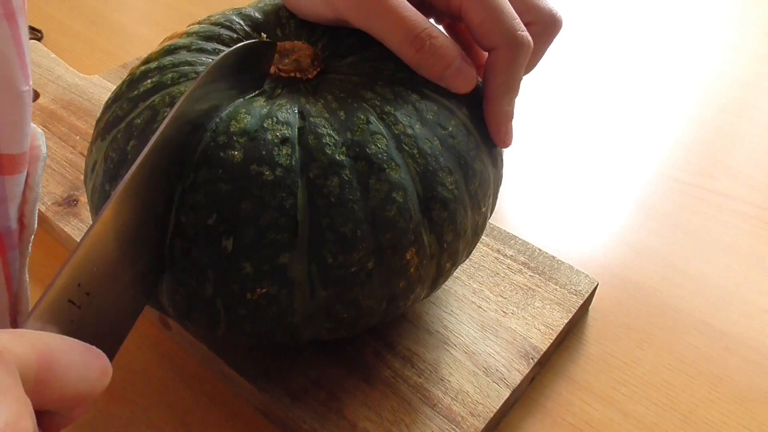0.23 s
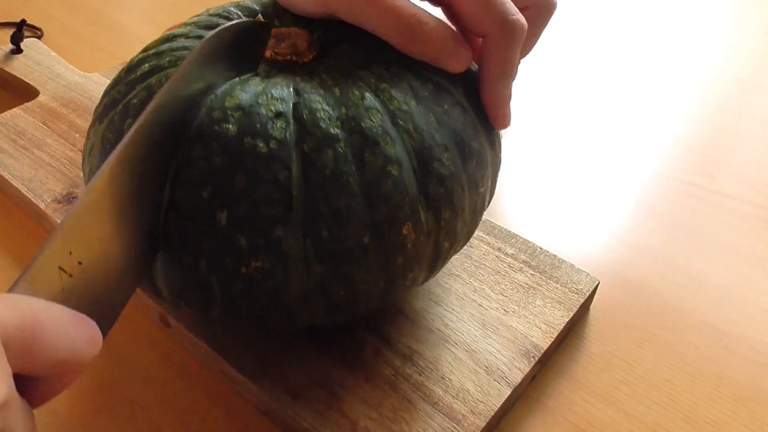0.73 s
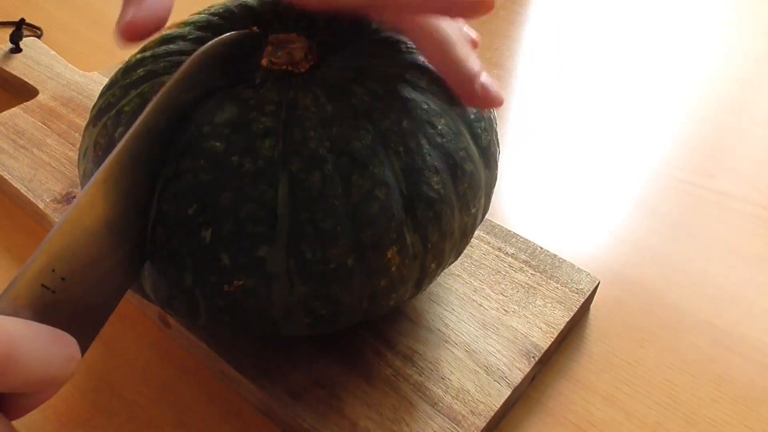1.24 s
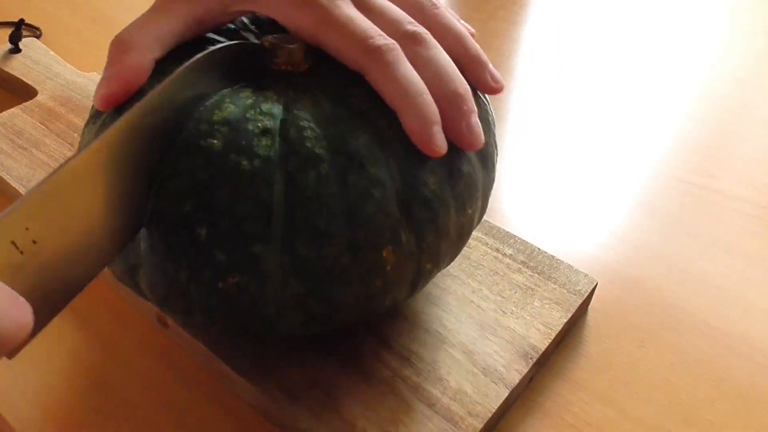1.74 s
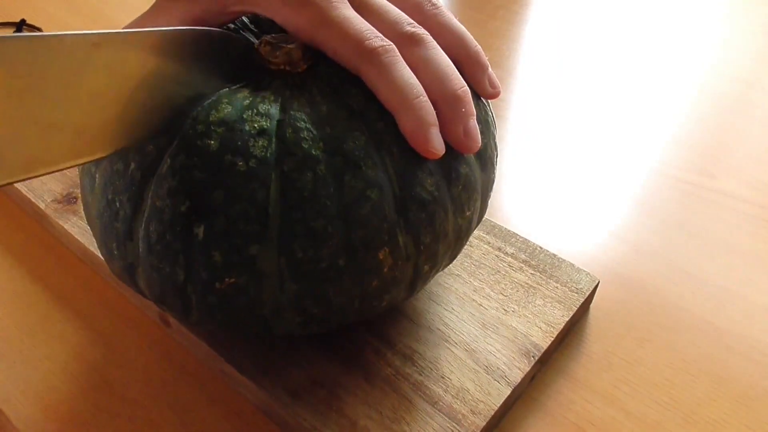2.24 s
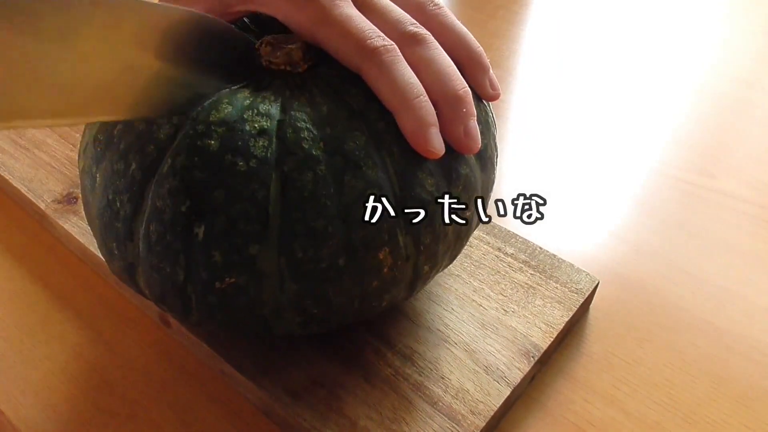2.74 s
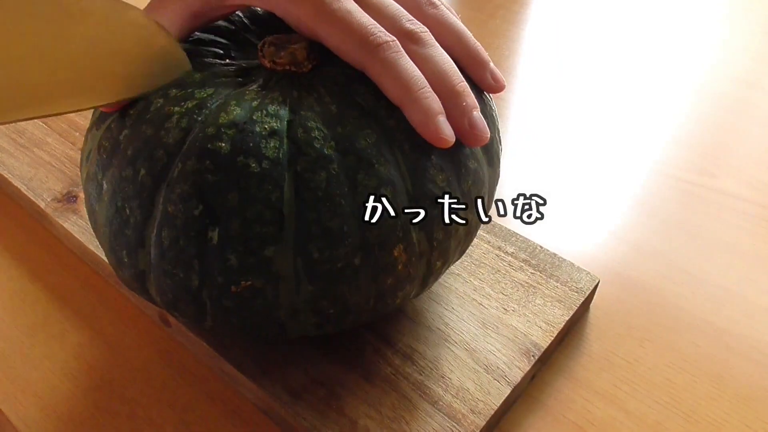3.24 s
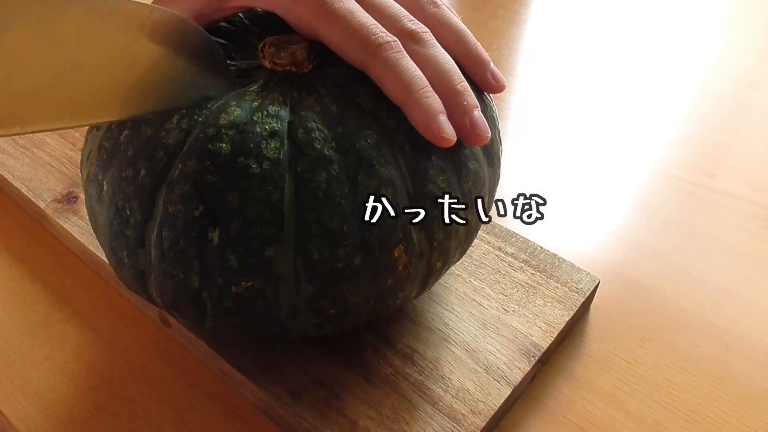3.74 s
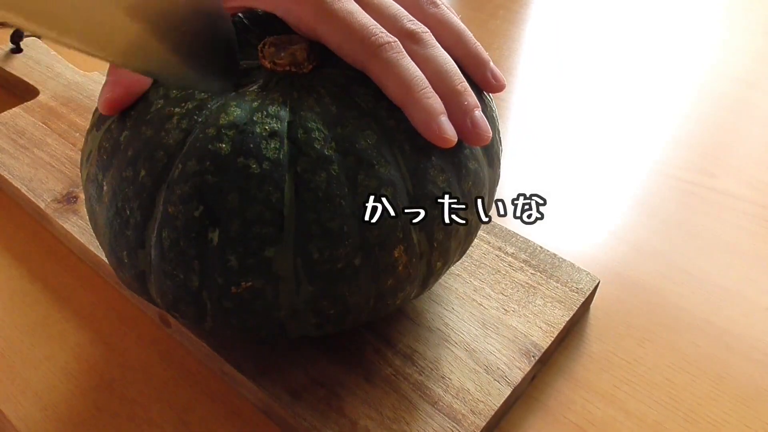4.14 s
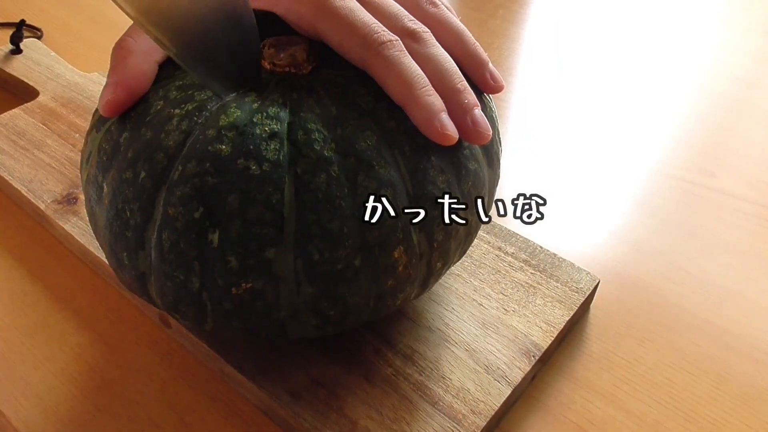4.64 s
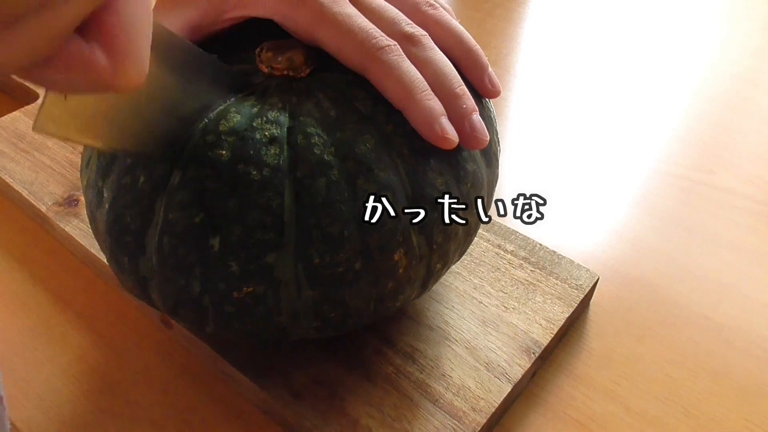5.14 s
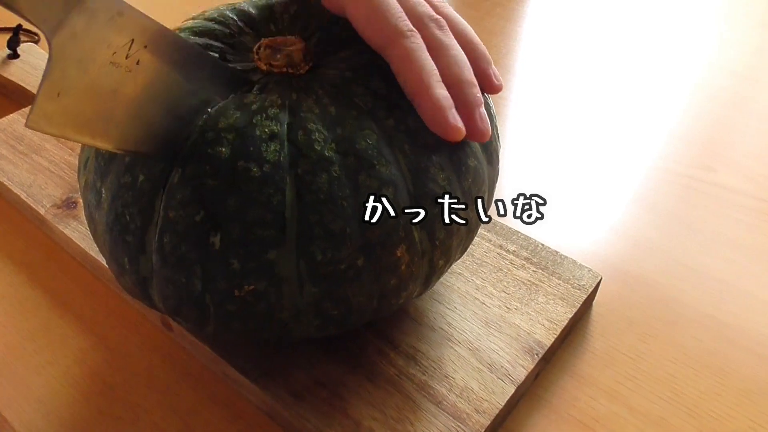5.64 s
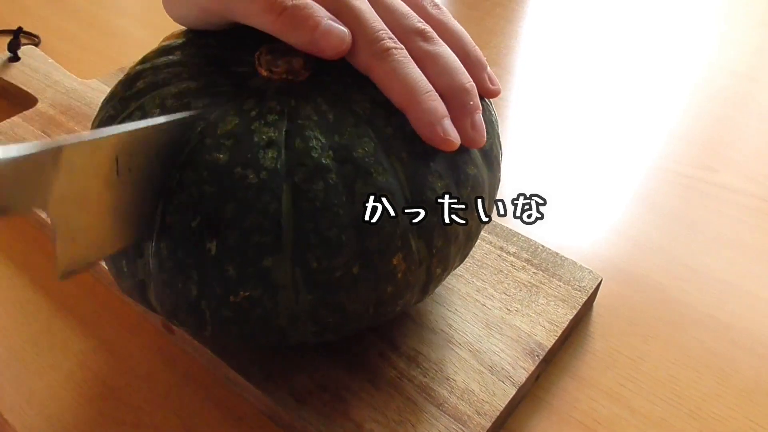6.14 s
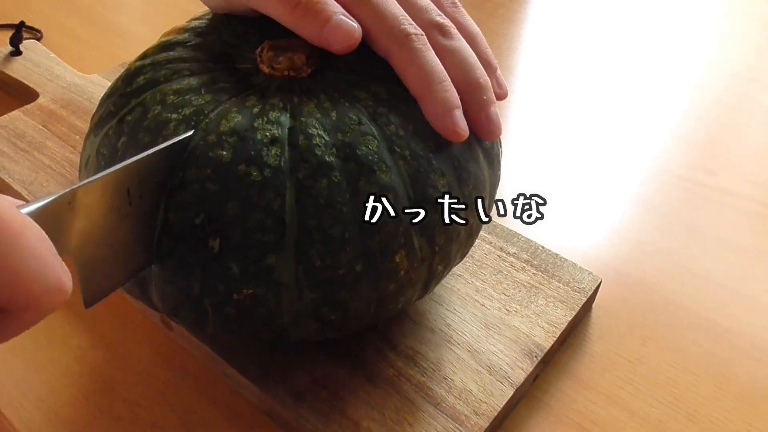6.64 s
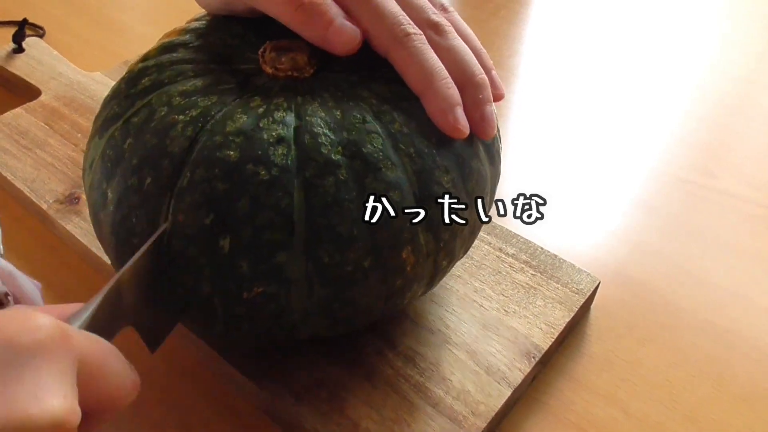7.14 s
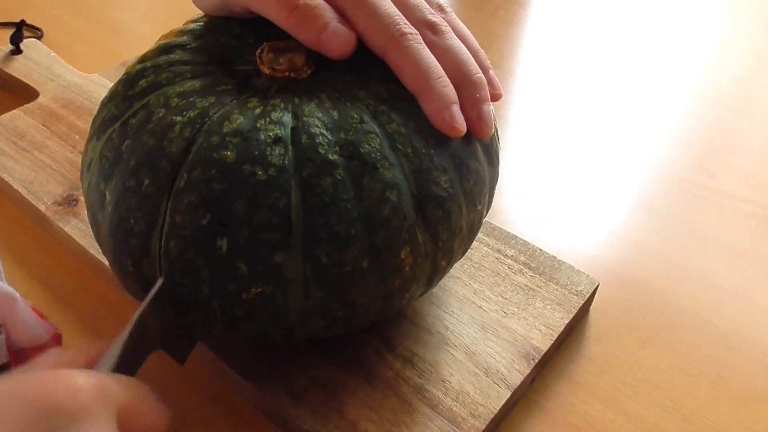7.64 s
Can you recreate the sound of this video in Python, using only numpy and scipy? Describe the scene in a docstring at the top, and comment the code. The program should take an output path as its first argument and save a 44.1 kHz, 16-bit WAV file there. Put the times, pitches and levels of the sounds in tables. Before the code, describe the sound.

In a quiet room with a soft hum, a hand rubs on a knife handle. The blade is then worked into a hard squash in short, crunching pushes, and the squash knocks on a wooden board and table. The steel taps the rind and rings faintly, then squeaks and scrapes as the rind snaps. Near the end it splits with the loudest knock, followed by a few more cracks. Small ticks sound close to the microphone.

```python
"""A kitchen knife is worked into a hard squash on a wooden board, in a quiet, humming room.
First a hand rubs on the handle; from then on a small part of a nearby camera ticks now and then.
From 1 s the blade rubs through the flesh in short pushes, and the squash knocks on board and table.
Near 2.9 s the steel taps the rind and rings faintly; then it squeaks and the rind snaps as it cuts on.
Just after 7.2 s the rind splits with the loudest knock; a last few cracks and knocks follow near 7.7 s."""
import sys
import numpy as np
from scipy import signal
from scipy.fft import rfft, irfft
from scipy.io import wavfile

SR = 44100
rng = np.random.default_rng(int(sys.argv[2]) if len(sys.argv) > 2 else 0)


def dump_mix(stems):
    """Bounce the given channels to the path in sys.argv[1] as a 16-bit WAV at rate SR."""
    frames = np.atleast_2d(stems).T  # one column per channel
    limited = np.clip(frames, -1, 1)  # hard clip at full scale
    pcm = np.round(limited * 32767).astype(np.int16)
    wavfile.write(sys.argv[1], SR, pcm)


N = 347949
HZ = np.fft.rfftfreq(N, 1 / SR)
RING_T = np.arange(SR // 2) / SR  # half a second for a struck thing to ring
TILT_PIVOT_HZ = 4000  # a sound is made brighter or duller around this pitch


def amp(db):
    """Turns decibels into gain."""
    return 10 ** (np.asarray(db) / 20)


def unit(x):
    """Scales a signal to an average (rms) level of 1."""
    return x / np.sqrt(np.mean(x ** 2) + 1e-20)


def read(points, hz):
    """Reads between the rows of a table, on a log-frequency axis."""
    f, value = np.transpose(points)
    return np.interp(np.log(hz + 1), np.log(f), value)


def add(mix, s, sound):
    """Mixes a sound in at s seconds."""
    part = mix[..., max(round(s * SR), 0):][..., :sound.shape[-1]]
    part += sound[..., :part.shape[-1]]


def convolve(x, response):
    """Passes a signal through a response, channel by channel."""
    return signal.fftconvolve(np.atleast_2d(x), np.atleast_2d(response), axes=1)[:, :N]


def ring(modes, flip=True):
    """A struck body's tones, each fading 60 dB in its fade time t60; flip inverts every second one."""
    wave = sum((-1 if flip else 1) ** k * amp(db - 60 * RING_T / t60) * np.cos(2 * np.pi * hz * RING_T)
               for k, (hz, db, t60) in enumerate(modes))
    return wave / abs(wave).max()


def click(spectrum, size=2048):
    """A click with a sharp front and the given tone colour, of energy 1."""
    log_gain = np.log(amp(read(spectrum, abs(np.fft.fftfreq(size, 1 / SR)))))
    wave = np.fft.ifft(np.exp(signal.hilbert(log_gain))).real
    wave = np.roll(wave[::-1], 1)[:size // 2]
    return wave / np.linalg.norm(wave)


def stereo(sources, spectrum, alike):
    """Colours two unrelated signals and blends them into a partly alike left and right."""
    left, other = rfft(sources)
    same = np.clip(read(alike, HZ), 0, 1)
    right = same * left + np.sqrt(1 - same ** 2) * other
    return unit(irfft(np.array([left, right]) * amp(read(spectrum, HZ)), N))


def drift(rate_hz):
    """A smooth random wander of average size 1."""
    return unit(irfft(rfft(rng.standard_normal(N)) * np.exp(-(HZ / rate_hz) ** 2), N))


def resonate(x, hz, width_hz):
    """Makes a signal ring around one pitch, which may glide."""
    turn = np.exp(2j * np.pi * np.cumsum(hz * np.ones(x.shape[-1])) / SR)
    decay = np.exp(-np.pi * abs(width_hz) / SR)
    return unit((turn * signal.lfilter([1 - decay], [1, -decay], x / turn)).real)


def grainy(grain_db, channels=2, size=N):
    """Noise roughened by random jumps in level."""
    return rng.standard_normal((channels, size)) * amp(grain_db * np.minimum(rng.exponential(1, size), 6))


def crackle(per_s):
    """Single spikes at random moments, in two channels."""
    return rng.standard_normal((2, N)) * (rng.random(N) < per_s / SR)


# The colour of the ventilation. Each row: frequency in Hz, relative level in dB.
VENT_COLOUR = [(20, -22), (50, -15), (85, -6.5), (130, -10), (228, -5.5), (400, -6.5), (520, -10.5),
               (900, -12.5), (1300, -19), (1900, -29), (3000, -33.5), (3800, -32), (4600, -34.5),
               (6400, -37.5), (8200, -33), (9100, -32), (9800, -33.5), (10500, -32), (12000, -36),
               (16000, -39)]
# How alike left and right are for air and hand. Each row: frequency in Hz, likeness from 0 to 1.
AIR_ALIKE = [(60, 0.89), (290, 0.81), (640, 0.55), (1400, 0.5), (3100, 0.39), (7000, 0.15), (15000, 0)]
# The hum of an appliance. Each row: pitch in Hz, level in dB.
HUM_TONES = [(140, -70.5), (457.6, -70), (500.6, -72.5), (936.7, -75)]
def room_tone(vent_db=-53.5, swell_db=0.5, waver_db=2.5, whine_db=-77.5):
    """Soft ventilation noise, an appliance's wavering hum and a thin electric whine."""
    t = np.arange(N) / SR
    hum = sum(amp(db + waver_db * drift(3.0)) * np.sqrt(2) * np.sin(2 * np.pi * hz * t + drift(4.3))
              for hz, db in HUM_TONES)
    whine = amp(whine_db) * resonate(rng.standard_normal((2, N)), hz=9050, width_hz=250)
    vent_gain = amp(vent_db + swell_db * drift(5.9))
    return vent_gain * stereo(rng.standard_normal((2, N)), VENT_COLOUR, AIR_ALIKE) + hum + whine


# How long the room rings. Each row: frequency in Hz, fade time in seconds.
ROOM_FADE = [(100, 0.55), (400, 0.3), (2000, 0.28), (12000, 0.028)]
def room_echo(x, first_echo_s=0.00455):
    """Reflections blur into a short tail whose high notes die first."""
    noise = rng.standard_normal((2, len(RING_T))) * (RING_T > first_echo_s)
    hz, t, bands = signal.stft(noise, SR, nperseg=256)
    tail = signal.istft(bands * amp(-60 * t / read(ROOM_FADE, hz)[:, None]), SR, nperseg=256)[1]
    return convolve(x, tail / np.linalg.norm(tail[0]))


# The camera's ticks. Each row: start in seconds, level in dB.
CAMERA_TICKS = [(0.3598, -35), (0.4726, -37.5), (1.193, -25), (1.2645, -27), (1.381, -37.5), (1.4417, -43),
                (1.798, -20), (1.8856, -21.5), (2.0357, -22), (2.9652, -22), (3.081, -36), (3.1837, -41),
                (3.3054, -43.5), (5.248, -21.5), (5.3005, -25.5), (5.3664, -24.5), (6.1264, -27),
                (6.381, -22.5), (7.258, -30)]
# The ticking part's tones. Each row: pitch in Hz, left and right relative dB, fade time in seconds.
TICK_TONES = [(978, -4, -9.5, 0.03), (1157, -2, -6, 0.023), (2000, -8, -11, 0.022),
              (2430, -12.5, -15, 0.02), (2960, -11, -19, 0.039), (3580, 3, -5.5, 0.012),
              (4370, -24, -31.5, 0.022), (4750, -13, -14, 0.013), (5310, -6.5, -6, 0.018),
              (5980, 3, -8, 0.0076), (6800, -5, -1, 0.0068), (7480, -8, 5, 0.0038), (8700, -4, -3, 0.0037),
              (10100, -30, -25, 0.0021), (13300, -18, -7, 0.004)]
def camera_ticks(right_db=-4.5, right_lag_s=0.00021, buzz_db=-8, buzz_t60=0.015, detune=0.008):
    """A small part ticks, a little differently each time, and the casing buzzes for an instant."""
    out, t = np.zeros((2, N)), RING_T[:SR // 20]
    hardest_db = max(db for _, db in CAMERA_TICKS)
    usual_hz, left_tones_db, right_tones_db, t60 = np.transpose(TICK_TONES)
    for s, db in CAMERA_TICKS:
        hz = usual_hz * (1 + detune * rng.standard_normal(len(usual_hz)))
        change_db = 1.2 * rng.standard_normal(len(hz))
        change_db += 0.23 * (db - hardest_db) * np.log2(hz / TILT_PIVOT_HZ)  # a softer tick is duller
        add(out[0], s, amp(db) * ring(zip(hz, left_tones_db + change_db, t60)))
        add(out[1], s + right_lag_s, amp(db + right_db) * ring(zip(hz, right_tones_db + change_db, t60)))
        buzz = rng.standard_normal((2, len(t))) * amp(buzz_db - 60 * t / buzz_t60)
        add(out, s, amp(db) * convolve(buzz, click(SNAP_COLOUR)))
    return out


# The hand shifting its grip. Each row: time in seconds, level in dB.
GRIP_LEVEL = [(0, -49), (.05, -50.5), (.11, -50), (.14, -49.5), (.2, -43.5), (.26, -46), (.32, -57),
              (.36, -90)]
# The colours of the skin's low rub and its hiss. Each row: frequency in Hz, relative level in dB.
RUB_COLOUR = [(60, -20), (160, -9.5), (280, 1.5), (400, 4), (560, -5.5), (740, -7.5), (1200, -16.5),
              (2200, -23.5), (4000, -50)]
RUB_HISS_COLOUR = [(1000, -18), (2500, -6), (4200, 0.5), (6000, -0.5), (9000, 3.5), (13000, -4),
                   (16000, -18)]
def hand_rub(slip_db=1.5, slip_hz=60, hiss_db=-14, hiss_grows=0.41):
    """Skin rubs on the handle in uneven slips; the harder the rub, the more it hisses."""
    level_db = np.interp(np.arange(N) / SR, *np.transpose(GRIP_LEVEL), right=-200)
    hiss_gain = amp(hiss_db + hiss_grows * (level_db - level_db.max()))
    hiss = hiss_gain * stereo(rng.standard_normal((2, N)), RUB_HISS_COLOUR, CUT_ALIKE)
    slips = amp(level_db + slip_db * drift(slip_hz))
    return slips * (stereo(rng.standard_normal((2, N)), RUB_COLOUR, AIR_ALIKE) + hiss)


# The squash's knocks. Each row: start in seconds, squash level in dB, board level in dB, contact time
# in milliseconds, pitch in Hz and fade time in seconds of the squash's lowest tone (the grip changes
# them), then the same two for the board's main tone (higher and shorter when it tips on its edge).
KNOCKS = [(0.2968, -35.5, -40, 0.2, 312, 0.059, 138.0, 0.24),
          (1.1263, -30, -30, 0.69, 304, 0.088, 137.6, 0.32),
          (1.1387, -27.5, -28, 0.58, 294, 0.088, 136.7, 0.3),
          (1.1669, -28, -35, 0.32, 302, 0.086, 166.0, 0.18),
          (1.733, -26, -29.8, 0.78, 308, 0.067, 142, 0.25),
          (1.7356, -20, -20.5, 0.36, 301.0, 0.072, 137.4, 0.22),
          (1.748, -18, -24.5, 0.61, 304.0, 0.066, 137.0, 0.1),
          (1.787, -30.3, -31, 0.58, 308.0, 0.069, 139.0, 0.28),
          (1.8301, -29.4, -23, 0.4, 307.0, 0.039, 152.5, 0.18),
          (1.843, -28, -31, 0.36, 287.0, 0.086, 171, 0.12),
          (1.9824, -21, -23.5, 0.35, 311, 0.064, 136.8, 0.24),
          (1.9963, -26.7, -28.3, 0.36, 303, 0.036, 137.0, 0.2),
          (2.0166, -29.5, -29, 0.3, 305.0, 0.072, 128, 0.14),
          (2.872, -25, -42, 0.16, 278, 0.033, 145, 0.28),
          (2.987, -38, -30.6, 0.3, 304.0, 0.064, 158.2, 0.18),
          (3.6255, -27.5, -38, 0.72, 326, 0.081, 134.7, 0.28),
          (3.6478, -33.5, -44, 0.69, 280, 0.072, 144, 0.27),
          (5.0632, -34.5, -44.0, 0.35, 294.0, 0.057, 140, 0.24),
          (5.103, -35.4, -43, 0.36, 317, 0.062, 141.0, 0.21),
          (5.1388, -41, -31.5, 0.86, 283.0, 0.072, 143, 0.25),
          (5.2176, -33, -33.5, 0.3, 293, 0.072, 153, 0.23),
          (5.2541, -36, -36, 0.28, 291.0, 0.068, 143, 0.27),
          (5.9843, -32.5, -39, 0.3, 313, 0.078, 144, 0.28),
          (6.0437, -14, -20.1, 0.36, 284.0, 0.027, 135.8, 0.24),
          (6.0594, -25, -23, 0.3, 338.0, 0.029, 136.4, 0.22),
          (6.2972, -29.0, -38, 0.3, 290, 0.079, 144.0, 0.25),
          (6.405, -32.5, -26, 0.24, 314, 0.063, 157.4, 0.18),
          (6.7944, -42.8, -39.5, 0.73, 302, 0.072, 146, 0.28),
          (6.9298, -26, -41, 0.32, 313, 0.1, 137.3, 0.25), (7.1981, -6, -9, 0.22, 330, 0.056, 140.5, 0.17),
          (7.214, -15, -22, 0.28, 282, 0.088, 143, 0.16),
          (7.227, -20, -17.5, 0.27, 315.0, 0.06, 135.0, 0.13),
          (7.2664, -18, -22.5, 0.28, 340, 0.026, 165, 0.17),
          (7.309, -31, -30, 0.24, 302, 0.041, 154.0, 0.15), (7.3577, -26, -25, 0.3, 320, 0.1, 159.6, 0.13),
          (7.378, -25.5, -31, 0.26, 310, 0.045, 152.5, 0.2),
          (7.727, -24.5, -37, 0.065, 339.0, 0.058, 144.0, 0.092),
          (7.7365, -18.5, -23.0, 0.38, 326, 0.069, 131, 0.3),
          (7.7624, -15.4, -30, 0.56, 310, 0.063, 144.0, 0.11),
          (7.785, -21.5, -27.2, 0.35, 310, 0.076, 144.0, 0.2)]
# The tones of the board on its table and of the squash, retuned for each knock.
# Each row: pitch in Hz, relative level in dB, fade time in seconds.
BOARD_TONES = [(56, -19, 0.059), (100, 1.5, 0.046), (136.7, 2.5, 0.19), (200.3, 0.5, 0.16),
               (249.4, -8.5, 0.13)]
SQUASH_TONES = [(310.7, 9.5, 0.052), (350, -3, 0.058), (390, 2.5, 0.046), (503, -10, 0.071),
                (675, -2, 0.066), (1087, -5.5, 0.076), (1380, -6, .04)]
# The colour of slapped wood. Each row: frequency in Hz, relative level in dB.
CLACK_COLOUR = [(100, -52.5), (250, -11), (420, 17), (700, 1), (1080, -2), (1600, -18.5), (3000, -16.5),
                (8000, -29)]
def squash_knocks(rebound_s=0.00628, rebound=0.67, judder_t60=0.35, clack_db=-23, clack_t60=0.24,
                  stereo_width=0.45, slap_db=14, swing_s=0.0025, uneven_db=1.0):
    """The squash lands, rebounds once and judders; the board passes the blow to the table, which booms."""
    out, wood = np.zeros((2, N)), click(CLACK_COLOUR)
    swing = 1 - np.exp(-RING_T / swing_s)  # the table needs a moment to get moving
    lowest_hz, _, lowest_t60 = SQUASH_TONES[0]
    main_hz, _, main_t60 = BOARD_TONES[2]
    for s, squash_db, board_db, contact_ms, squash_hz, squash_t60, board_hz, board_t60 in KNOCKS:
        # no two landings hit the same spot, so the board's tones vary in level
        board = swing * ring([(hz * board_hz / main_hz, db + uneven_db * rng.standard_normal(),
                               t60 * board_t60 / main_t60) for hz, db, t60 in BOARD_TONES])
        squash = ring([(hz * squash_hz / lowest_hz, db, t60 * squash_t60 / lowest_t60)
                       for hz, db, t60 in SQUASH_TONES], flip=False)
        contact_s = contact_ms / 1000
        blow = RING_T / contact_s * np.exp(-RING_T / contact_s)
        boom, thud = convolve(blow, board), convolve(blow, squash)
        add(out, s - contact_s, amp(board_db) * boom / abs(boom).max())
        noise = rng.standard_normal((3, len(RING_T)))
        noise = noise[0] + stereo_width * noise[1:]
        # the first blow, the rebound, and only then the loose judder
        judder = noise * amp(-60 * RING_T / judder_t60) * (RING_T > 2 * rebound_s)
        judder_db = -14.5 - 0.81 * (squash_db + 28)  # a heavy blow seats it, a light one lets it judder
        force = amp(judder_db) * judder / np.linalg.norm(judder[0])
        force[:, 0] += 1 / (1 + rebound)
        force[:, round(rebound_s * SR)] += rebound / (1 + rebound)
        add(out, s - contact_s, amp(squash_db) * convolve(force, thud / abs(thud).max()))
        # the first contact slaps the wood, whose many higher tones blur into one short clack
        slap = amp(slap_db) * blow / blow.sum()
        clack = amp(clack_db - 60 * RING_T / clack_t60) * noise[:, ::-1]
        add(out, s - contact_s, amp(squash_db) * convolve(slap + clack, wood))
    return out


# Pitched sounds of the blade: squeaks, creaks, a short steel tap and a faint ring. Each row: middle in
# seconds, length in seconds, first pitch in Hz, last pitch in Hz, width of the band in Hz, level in dB.
PITCHED_BLADE_SOUNDS = [(3.662, .11, 4620, 4610, 38, -65), (3.662, 0.092, 5400, 5400, 150, -69),
                        (3.655, .07, 5750, 5750, 150, -71), (4.266, .014, 5300, 5300, 350, -57),
                        (4.266, .014, 9200, 9200, 500, -58), (4.295, .05, 5300, 5220, 200, -64),
                        (2.3, .7, 3800, 3800, 150, -77), (5.508, 0.12, 10400, 9000, 1500, -55),
                        (5.553, .13, 4200, 3850, 750, -51.5), (5.585, 0.14, 8000, 6500, 2500, -65),
                        (4.295, .05, 7750, 7700, 250, -65), (4.295, .05, 9250, 9200, 300, -62),
                        (4.66, .12, 4400, 4300, 900, -61), (4.92, .1, 4400, 4100, 600, -57),
                        (5.9, .4, 7300, 7200, 900, -62), (6.19, .04, 6000, 5800, 2200, -48),
                        (6.27, .14, 8200, 7700, 1800, -52), (6.205, .08, 488, 398, 31, -44.5),
                        (6.314, .11, 345, 175, 20, -40.5), (7.287, 0.028, 4180, 4160, 300, -41)]
def pitched_blade_sounds(chatter_db=0.5, chatter_hz=140, grain_db=5.0):
    """Each sound is a rough, grainy band of noise that swells and fades while its pitch holds or sinks."""
    out = np.zeros((2, N))
    for middle_s, length, from_hz, to_hz, width_hz, db in PITCHED_BLADE_SOUNDS:
        t = np.arange(round(length * SR)) / SR
        noise = grainy(grain_db, channels=3, size=len(t))
        band = resonate(noise[0] + 0.5 * noise[1:], np.linspace(from_hz, to_hz, len(t)), width_hz)
        add(out, middle_s - length / 2, amp(db) * band * np.sin(np.pi * t / length))
    return out * unit(amp(chatter_db * drift(chatter_hz)))


# The free blade's tones. Each row: pitch in Hz, relative level in dB, fade time in seconds.
FREE_BLADE_TONES = [(2880, -22, .55), (3838, -28, 0.81), (4608, -3, .068), (4888, -18.5, .85),
                    (5370, -1, .045), (5720, 7, .028), (6430, 0, .03), (7230, -27, 1), (7550, 2, .03),
                    (8100, 8, 0.043), (9964, -21, 0.47), (11600, -11, .035), (13220, -10, 0.054)]
def blade_tap(start_s=2.8717, level_db=-20.5, left_lag_s=0.00007):
    """The steel meets the rind and rings briefly."""
    out, tap = np.zeros((2, N)), amp(level_db) * ring(FREE_BLADE_TONES)
    add(out[0], start_s + left_lag_s, tap)
    add(out[1], start_s, tap)
    return out


RISE_SHARE, FALL_SHARE = 0.25, 0.62  # the parts of a push spent swelling and easing off
USUAL_HISS_DB = -52  # the hiss of an ordinary push
# The blade's pushes. Each row: start in seconds, length in seconds, hiss in dB, groan in dB.
PUSHES = [(1.037, 0.33, -69, -49.5), (1.503, 0.062, -57, -74), (1.71, 0.3, -63.5, -44),
          (2.848, 0.05, -56, -58), (2.917, 0.31, -65.5, -56), (4.238, 0.13, -67, -47),
          (4.536, 0.28, -66.5, -46.5), (4.857, .22, -53, -42), (5.111, 0.22, -48, -40.5),
          (5.356, .19, -61, -45.5), (5.427, 0.32, -61.5, -75), (5.583, 2, -67, -57), (5.804, 0.2, -73, -48),
          (5.954, 0.14, -54, -40), (6.126, 0.29, -52.5, -42.5), (6.412, 0.21, -56.5, -55),
          (6.839, 0.16, -48.5, -43.5), (7.109, 0.15, -52.5, -49.5), (7.163, 0.073, -40, -36.5),
          (7.223, 0.087, -63, -32.5), (7.354, 0.049, -59, -36), (7.405, 0.16, -54.5, -53),
          (7.438, 0.089, -43, -43), (7.447, 0.087, -67, -34.5), (7.499, 0.27, -73, -54.5),
          (7.714, 0.11, -45.5, -35)]
def push_power(longest_ramp_s=0.17, usual_steel_db=-58.5, steel_follows=0.69):
    """The power of hiss, groan and steel over time, as each push swells, holds and eases off."""
    t, power = np.arange(N) / SR, np.zeros((3, N))
    for s, length, hiss_db, groan_db in PUSHES:
        rise, fall = np.minimum(length * np.array([RISE_SHARE, FALL_SHARE]), longest_ramp_s)
        pressure = np.clip(np.minimum((t - s) / rise, (s + length - t) / fall), 0, 1)
        steel_db = usual_steel_db + steel_follows * (hiss_db - USUAL_HISS_DB)  # a loud cut rings more
        power += amp([[hiss_db], [groan_db], [steel_db]]) ** 2 * pressure ** 3
    return power


# The colours of the cut's hiss, crunch and groan. Each row: frequency in Hz, relative level in dB.
HISS_COLOUR = [(700, -19), (1500, 0.5), (2200, 0), (2700, -4), (3900, 3.5), (5200, 2), (8000, 5.5),
               (11000, -1.5), (14000, -7.5), (16000, -24)]
CRUNCH_COLOUR = [(300, -18), (600, 6.5), (1050, 4), (1450, -1), (2000, -10.5), (2800, -19), (5000, -14.5)]
GROAN_COLOUR = [(40, -25), (90, -3), (140, -7), (220, 0), (320, 2), (450, -13), (650, -10.5), (1100, -24.5),
                (1700, -34), (3000, -83)]
# How alike left and right are at the knife. Each row: frequency in Hz, likeness from 0 to 1.
CUT_ALIKE = [(60, 1), (290, 0.91), (700, 0.7), (3500, 1), (7000, 0.44), (15000, .05)]
# The blade's tones, damped by the flesh. Each row: pitch in Hz, relative dB, fade time in seconds.
GRIPPED_BLADE_TONES = [(3620, -7, 0.0096), (4560, -3.5, 0.0069), (5260, -2, 0.0074), (6470, -6, .007),
                       (7700, -1, .007), (9160, -1.5, 0.0049), (10600, -2, .005), (12100, -9, .007),
                       (12900, -5, .006)]
def slicing(slip_db=2.4, slip_hz=90, fibre_db=-10, crunch_db=-4, hollow_db=-4, lurch_db=1.0, lurch_hz=35,
            treble_hz=6500):
    """Cells burst along the blade in uneven slips: the cut hisses, the flesh groans, the steel scrapes."""
    hiss_gain, groan_gain, steel_gain = np.sqrt(push_power()) * amp(slip_db * (drift(slip_hz) - 1 / 4))
    cells = grainy(grain_db=2.5)
    fibres = crackle(per_s=130)  # the odd tough strand parts with a click
    clumps = crackle(per_s=350)  # whole clumps of cells give way under a hard push
    shift_db = np.clip(1.5 * drift(rate_hz=25), -9, 9)  # the hiss brightens and dulls as the blade bites
    fizz = stereo(cells, HISS_COLOUR, CUT_ALIKE)
    dull = irfft(rfft(fizz) / (1 + (HZ / treble_hz) ** 4), N)
    tearing = unit(dull * amp(shift_db) + (fizz - dull) * amp(-shift_db))
    tearing += amp(fibre_db) * stereo(fibres, SNAP_COLOUR, CUT_ALIKE)
    crunch = amp(crunch_db) * np.sqrt(hiss_gain * groan_gain) * stereo(clumps, CRUNCH_COLOUR, CUT_ALIKE)
    # the hollow squash hums along with the groan
    hollow = amp(hollow_db) * resonate(rng.standard_normal(N), hz=312, width_hz=24)
    groan = unit((stereo(cells[::-1], GROAN_COLOUR, CUT_ALIKE) + hollow) * amp(lurch_db * drift(lurch_hz)))
    scrape = unit(convolve(grainy(grain_db=4.0), ring(GRIPPED_BLADE_TONES)))
    return hiss_gain * tearing + crunch + groan_gain * groan + steel_gain * scrape


def stray_cracks(per_s=22, usual_db=-46, follows_hiss=0.59, range_db=13, t60=0.0087):
    """Small random breaks once a push has loaded the blade, as rows like those of RIND_CRACKS."""
    for s, length, hiss_db, _ in PUSHES:
        loudest_db = usual_db + follows_hiss * (hiss_db - USUAL_HISS_DB)
        for place, softness in rng.random((int(length * per_s), 2)):
            yield s + length * (RISE_SHARE + place / 2), loudest_db - range_db * softness, t60, 0


# The clear cracks, which run together where the rind splits. Each row: start in seconds,
# level in dB, fade time in seconds, tilt in dB per octave (higher is brighter).
RIND_CRACKS = [(1.0576, -39.5, 0.0084, 0), (1.116, -46, .007, 2), (1.2243, -44, .007, -2),
               (1.829, -33, 0.023, -6), (2.8705, -33.5, 0.0078, 6.5), (2.873, -35, 0.038, -10),
               (5.06, -40.5, 0.012, -2.5), (5.0934, -41.5, 0.014, -1), (5.18, -36, 0.0091, 1),
               (5.383, -45, 0.011, -2), (5.408, -50, .009, -1), (5.4325, -44, 0.015, 3.5),
               (5.8074, -30.5, 0.0072, 5.5), (5.9649, -31, 0.0069, 6.5), (5.848, -38.5, 0.01, -4),
               (5.982, -38, 0.0083, -1), (6.0195, -39, .008, -1), (6.034, -36, .008, -1),
               (6.04, -36, 0.0089, 0), (6.087, -43, 0.007, -1.5), (6.14, -45, 0.0073, -1),
               (6.174, -37, .01, -3), (6.187, -38, .012, -5), (6.193, -34, 0.01, -3), (6.2, -33, .01, -1),
               (6.217, -35, 0.0068, 0.5), (6.3188, -26, 0.011, 0), (6.329, -37, .01, -1),
               (6.419, -40, 0.0099, -1.5), (6.484, -38, 0.0089, 7), (6.5466, -40.5, .01, 1),
               (6.567, -44, .008, 1), (6.831, -42, .01, -0.5), (7.203, -26, 0.014, 7),
               (7.218, -25, 0.017, -2.5), (7.2597, -19, 0.019, 0), (7.2648, -16.5, .022, 1),
               (7.2705, -23, 0.025, -0.5), (7.2755, -24, .024, -1.5), (7.2795, -24.5, 0.03, 0.5),
               (7.2855, -28, 0.02, -4), (7.289, -32, 0.014, 2), (7.3102, -39, 0.011, 0),
               (7.3259, -30, 0.024, -1.5), (7.3591, -29.5, .024, -5.5), (7.3655, -32.5, .016, 2.5),
               (7.3735, -27, 0.024, -1.5), (7.381, -29.5, 0.014, 0), (7.7269, -19.5, 0.017, -1.5),
               (7.731, -26.5, 0.04, -7), (7.751, -32, .035, -9), (7.796, -37, 0.011, 1)]
# The colour of a short snap (ticks and fibres use it too), and what a long crack adds to it.
# Each row: frequency in Hz, relative level in dB.
SNAP_COLOUR = [(200, -32), (600, 11.5), (1050, 19), (1600, 2.5), (2300, 9), (3000, 3.5), (4000, 8),
               (6000, 7), (8200, 6), (11000, -4), (16000, -10.5)]
LONG_CRACK_COLOUR = [(1050, -1.5), (2300, -0.5), (4500, -1), (7500, -0.5), (10500, 6), (16000, 1.5)]
def rind_cracks(grain_db=3.0, wander_db=0.5, widest_t60=0.027):
    """Each crack is a quickly dying shower of tiny fractures: bright at the skin, duller deep inside."""
    out, t = np.zeros((2, N)), RING_T[:SR // 20]
    hz, snap_db = np.transpose(SNAP_COLOUR)
    octaves = np.log2(np.clip(hz, 600, 8000) / TILT_PIVOT_HZ)
    for s, db, t60, tilt_db in [*RIND_CRACKS, *stray_cracks()]:
        fractures = rng.standard_normal((3, len(t))) * amp(grain_db * rng.exponential(1, len(t)))
        spread = np.clip(t60 / widest_t60, 0, 1)  # the longer a crack runs, the wider it sounds
        fade = amp(-60 * t / t60)
        burst = (np.sqrt(1 - spread) * fractures[0] + np.sqrt(spread) * fractures[1:]) * fade
        pan = amp(wander_db * spread * rng.standard_normal() * np.array([[1], [-1]]))
        colour_db = snap_db + tilt_db * octaves + spread * read(LONG_CRACK_COLOUR, hz)
        snap = click(np.transpose([hz, colour_db]))
        add(out, s, convolve(amp(db) * unit(pan * burst) * np.sqrt(np.mean(fade ** 2)), snap))
    return out


# The balance between the sides. Each row: frequency in Hz, left minus right in dB.
BALANCE = [(60, -1), (150, -5), (350, -2.5), (700, -1), (1300, 0.5), (3000, 1.5), (8000, 0.5),
           (15000, -1.5)]
def scene(knock_db=-0.95, cut_echo_db=-17, knock_echo_db=-18):
    """Knife, squash and room, with the low sounds leaning right; the ticks come through the casing."""
    cut = slicing() + hand_rub() + pitched_blade_sounds() + rind_cracks() + blade_tap()
    knocks = amp(knock_db) * squash_knocks()
    echo = room_echo(amp(cut_echo_db) * cut + amp(knock_echo_db) * knocks)
    airborne = cut + knocks + echo + room_tone()
    side_gains = amp(np.outer([0.5, -0.5], read(BALANCE, HZ)))
    return irfft(rfft(airborne) * side_gains, N) + camera_ticks()


def record(dry, cutoff_hz=16100):
    """Cuts off the very highest treble."""
    lowpass = signal.firwin(401, cutoff_hz, window=("kaiser", 9), fs=SR)
    return signal.oaconvolve(dry, lowpass[None], "same")


dry = scene()
out = record(dry)
dump_mix(out)
```